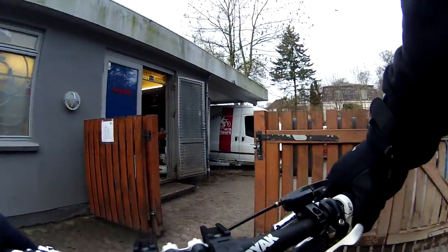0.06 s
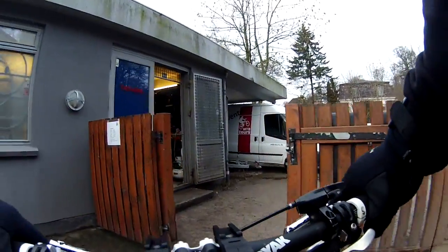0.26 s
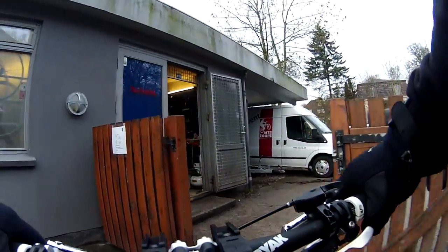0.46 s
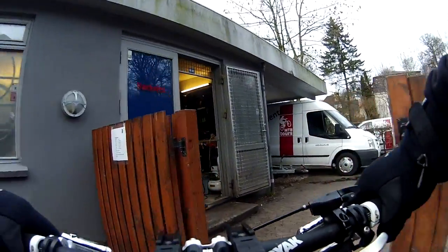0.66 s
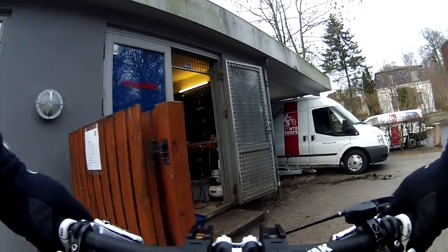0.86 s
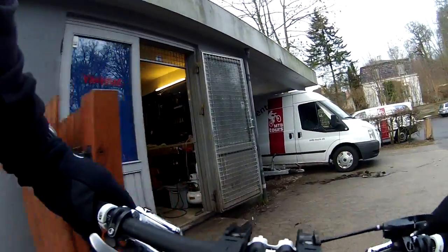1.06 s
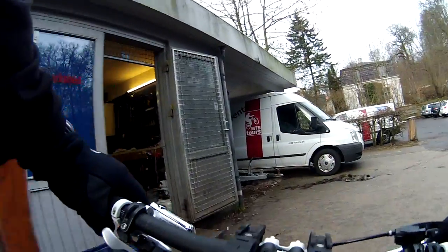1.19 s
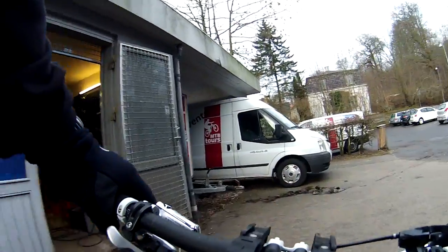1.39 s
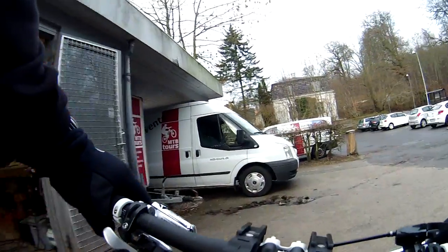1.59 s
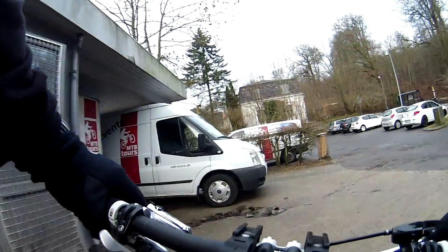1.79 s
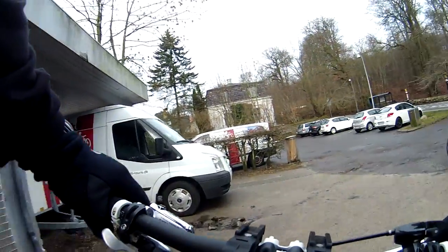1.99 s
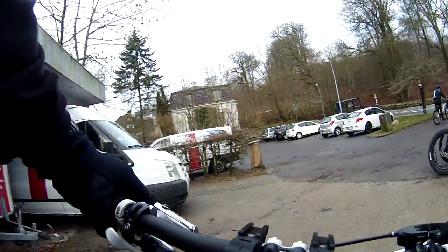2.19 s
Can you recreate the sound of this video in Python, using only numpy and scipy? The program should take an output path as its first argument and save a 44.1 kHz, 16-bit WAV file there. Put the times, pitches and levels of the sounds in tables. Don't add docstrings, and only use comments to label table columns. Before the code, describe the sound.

Bicycle tyres roll over paving with a low, uneven rumble and hum and fine gritty crunching. At about 0.24 s a hard knock on the camera housing clacks and distorts; the level ducks, then recovers by about 0.8 s. Pulsing rumble continues to about 2.25 s, with faint freewheel ticks quickening, small stone pings, deep mount throb, wind flutter and slight hiss. Close, rider-worn microphone outdoors.

```python
import sys
import numpy as np
from scipy import signal
from scipy.fft import rfft, irfft, next_fast_len
from scipy.io import wavfile
from scipy.ndimage import map_coordinates

SR = 44100
rng = np.random.default_rng(int(sys.argv[2]) if len(sys.argv) > 2 else 0)


def nominal_scale(level):
    x = np.asarray(level, float) / 20
    return 10 ** x


def put_to_file(sound):
    columns = np.atleast_2d(sound).T
    safe = np.clip(columns, -1, 1)
    whole_steps = np.round(safe * 32767)
    wavfile.write(sys.argv[1], SR, whole_steps.astype(np.int16))


N = 99225


def unit(x):
    return x / np.sqrt(np.mean(x ** 2) + 1e-20)


def curve(rows):
    return np.interp(np.arange(N) / SR, *np.transpose(rows))


def wobble(rate):
    return map_coordinates(rng.standard_normal(400), [np.arange(N) * rate / SR])


def coloured(x, points):
    m = 2 * next_fast_len(N // 2 + 4096)
    f, db = np.transpose(points)
    log_f = np.log(np.fft.rfftfreq(m, 1 / SR) + 1)
    log_gain = np.interp(log_f, np.log(f), db, left=db[0] + 11) * np.log(10) / 20
    cepstrum = irfft(log_gain, m)
    cepstrum[1:m // 2] *= 2
    cepstrum[m // 2 + 1:] = 0
    return irfft(rfft(x, m) * np.exp(rfft(cepstrum)), m)[..., :N]


def ring(modes, levels_db, rise_s):
    t = np.arange(SR // 2) / SR
    tones = 0
    for (hz, db, t60), more_db in zip(modes, levels_db):
        tones = tones + nominal_scale(db + more_db - 60 * t / t60) * np.sin(2 * np.pi * hz * t)
    return (1 - np.exp(-t / rise_s)) ** 2 * tones


def add_at(out, s, sound):
    out[round(s * SR):][:SR // 2] += sound


def resonance(hz, drift, rate):
    pitch = hz * (1 + drift * wobble(rate))
    return np.sqrt(2) * np.sin(2 * np.pi * np.cumsum(pitch) / SR)


def bursts(events, colour):
    t, white = np.arange(N) / SR, rng.standard_normal(N)
    size = sum((t > s) * nominal_scale(db - 60 * np.abs(t - s) / t60) for s, db, t60 in events)
    return coloured(white * size, colour) / np.std(coloured(white, colour))


# t/s, half length/s, level/dB
SLAB_JOINTS = [(0.03, 0.03, -42), (0.417, 0.13, -43.5), (0.721, 0.039, -35.5), (0.82, 0.013, -54),
               (0.867, .02, -36.5), (0.987, 0.056, -47), (1.074, 0.029, -31.5), (1.162, 0.019, -32),
               (1.219, 0.036, -36), (1.364, 0.039, -32), (1.426, 0.014, -32), (1.499, 0.034, -35.5),
               (1.608, 0.037, -45), (1.686, 0.038, -35), (1.789, 0.011, -31), (1.851, 0.039, -32.5),
               (1.94, 0.0095, -34.5), (2.001, 0.023, -33), (2.102, 0.045, -34), (2.219, .018, -35.5)]


def tyre_load_db():
    t, floor_db = np.arange(N) / SR, -52.5
    swells = sum(nominal_scale(db) * np.exp(-((t - s) / half) ** 2) for s, half, db in SLAB_JOINTS)
    return 20 * np.log10(nominal_scale(floor_db) + swells)


def tyre_hum(load_db):
    level = nominal_scale(load_db + 1.0 * wobble(29.52))
    lower = resonance(148.9, 0.035, 25.0)
    upper = nominal_scale(-12 + 2.5 * wobble(7.75)) * resonance(165, 0.0251, 24.78)
    return level * (lower + upper)


# t/s, level/dB
ROUGHNESS = [(0, -46), (.17, -48.5), (.4, -46), (.66, -47.5), (0.8, -47), (0.932, -45.5), (1.03, -45),
             (1.506, -50), (1.728, -51.5), (1.978, -48), (2.25, -49)]
# f/Hz, level/dB
RUMBLE_TONE = [(100, -22.5), (140, -2), (200, -4.5), (350, -5.5), (420, -8), (500, -23), (620, -29),
               (900, -64.5)]


def frame_rumble(load_db):
    rough_db, level_db = curve(ROUGHNESS), -36.5
    from_load_db = 0.16 * (load_db - load_db.mean())
    from_ground_db = 0.073 * (rough_db - rough_db.mean())
    shake_db = from_load_db + from_ground_db + 1.03 * wobble(35.41)
    return nominal_scale(level_db + shake_db) * unit(coloured(rng.standard_normal(N), RUMBLE_TONE))


# f/Hz, level/dB
GRIT_TONE = [(300, -13), (550, 0.5), (1300, -1.5), (2400, -5.5), (3500, -12), (5300, -15), (7000, -30.5),
             (12000, -41.5)]
# t/s, length/s, level/dB
GRIT_CRUNCHES = [(0.097, 0.017, -42), (0.345, 0.03, -40.5), (0.519, 0.0067, -43), (0.786, 0.016, -41.5),
                 (0.931, 0.0021, -35), (0.939, 0.046, -41.5), (1.012, 0.064, -46.5), (1.112, 0.011, -40.5),
                 (1.143, 0.013, -47), (1.187, 0.018, -42.5), (1.713, 0.015, -47), (1.765, 0.016, -49),
                 (1.805, 0.0072, -47), (1.849, 0.015, -50), (1.885, 0.013, -49), (1.966, 0.012, -51),
                 (2.076, 0.0055, -47), (2.17, 0.0054, -88)]


def tyre_grit():
    t, crunch = np.arange(N) / SR, 0
    for s, length, db in GRIT_CRUNCHES:
        rise = np.clip((t - s) / 0.0028, 0, 1)
        fall = np.clip(1.6 - (t - s) / length, 0, 1)
        crunch = crunch + nominal_scale(db) * rise * fall
    grain_db = 3 * np.minimum(rng.exponential(size=N), 3.5)
    grains = unit(rng.standard_normal(N) * nominal_scale(grain_db))
    bed = nominal_scale(curve(ROUGHNESS) + .4 * wobble(18) + .6 * wobble(45) + .9 * wobble(120))
    white = coloured(rng.standard_normal(N), GRIT_TONE)
    return coloured(grains * np.hypot(bed, crunch), GRIT_TONE) / np.std(white)


def tyres():
    load_db = tyre_load_db()
    return tyre_hum(load_db) + frame_rumble(load_db) + tyre_grit()


# t/s, level/dB
SWING = [(0, -35.5), (.1, -35.5), (.17, -40), (.4, -27), (.7, -33), (0.8, -32.5), (0.884, -44),
         (1.364, -30), (1.43, -38), (1.45, -66), (1.684, -27), (1.748, -52), (1.832, -33), (1.918, -33),
         (1.982, -69), (2.064, -33), (2.224, -65), (2.25, -31)]


def mount_sway():
    return nominal_scale(curve(SWING)) * resonance(30.8, 0.0872, 9.54)


# f/Hz, level/dB, t60/s
HOUSING_MODES = [(277.5, 9.3, .017), (749.5, -4.4, .014), (136, -30, .295), (407, -44, .35), (250, -44, .4),
                 (350, -46, .4), (307.7, -42.5, .45), (292.3, -45.4, .3), (177.8, -40.5, .34),
                 (424.5, -11.2, .02), (219.6, -18.6, .045)]
# t/s, f/Hz, level/dB, t60/s
CLIP_CLACKS = [
    (.2336, 2900, -25, .005),
    (.2362, 2050, -11, .008),
    (.2364, 2650, -13, .006),
    (.2364, 1540, -14, .009),
    (.2382, 4700, -8, .004),
    (.2382, 7500, -19, .003),
    (.2401, 3150, -12, .007),
    (.2403, 5200, -15, .008),
    (.2436, 5150, -10, .006),
    (.2436, 4300, -15, .006),
]
# t/s, level/dB, t60/s
RATTLE_CONTACTS = [
    (.2366, -25, .003),
    (.2383, -16.5, .003),
    (.24, -18, .005),
    (.2437, -30, .004),
]
# f/Hz, level/dB
RATTLE_TONE = [(500, -20), (1200, -14), (2000, 0), (3500, -2), (5000, -1), (6500, -8), (9000, -16),
               (15000, -21)]
# t/s, level/dB, t60/s
AFTER_BUZZES = [
    (.2332, -33, .015),
    (.241, -42, .55),
    (.2495, -37, .02),
    (.2655, -39, .015),
]
# f/Hz, level/dB
BUZZ_TONE = [(600, -14), (2200, 0), (3500, -4), (5000, -2), (6500, -12), (7600, -34), (12000, -55)]


def knock():
    out = np.zeros(N)
    rise_s = .0067
    add_at(out, .2348, nominal_scale(20.6) * ring(HOUSING_MODES, np.zeros(len(HOUSING_MODES)), rise_s))
    out = signal.sosfiltfilt(signal.butter(3, 130, "high", fs=SR, output="sos"), out)
    for s, hz, db, t60 in CLIP_CLACKS:
        add_at(out, s, ring([(hz, db, t60)], [0], rise_s=.00015))
    return out + bursts(RATTLE_CONTACTS, RATTLE_TONE) + bursts(AFTER_BUZZES, BUZZ_TONE)


# t/s, teeth passed/count
TEETH_PASSED = [(.04, -9), (.4575, 0), (.9174, 10), (1.1145, 14), (1.4612, 22), (1.97, 34), (2.26, 41)]
# t/s, level/dB
TICK_LEVEL = [(0, -52), (.4, -49), (.75, -47), (.83, -41), (.88, -46), (1.1, -44), (1.25, -46), (1.29, -43),
              (1.42, -47), (1.46, -37), (1.5, -41), (1.55, -40), (1.59, -44), (1.63, -41), (1.67, -45),
              (1.84, -40), (1.93, -44), (2.01, -41), (2.055, -37), (2.25, -37)]
# f/Hz, level/dB, t60/s
TICK_MODES = [(3850, 0, .011), (3500, -3, .009), (4200, -5, .009), (3150, -9, .008), (4700, -12, .007)]


def freewheel():
    scatter_db, muffle_db, rise_s = 1.3, 2, .0005
    s, teeth = np.transpose(TEETH_PASSED)
    tick_times = np.interp(np.arange(teeth[0], teeth[-1]), teeth, s)
    out = np.zeros(N + SR)
    for when, chance in zip(tick_times, rng.standard_normal((60, 6))):
        db = np.interp(when, *np.transpose(TICK_LEVEL)) + scatter_db * chance[0]
        add_at(out, when, nominal_scale(db + muffle_db) * ring(TICK_MODES, scatter_db * chance[1:], rise_s))
    return out[:N]


# t/s, f/Hz, level/dB, t60/s
SMALL_PINGS = [(.094, 1500, -44, .03), (1.806, 2600, -43, .012), (.357, 2400, -41, .03),
               (.605, 2300, -56, .2), (.646, 11000, -43, .0015), (.927, 1300, -33, .008),
               (1.124, 1040, -46, .06), (1.128, 1650, -48, .05), (1.704, 6500, -47, .003),
               (1.975, 5850, -63, .07), (1.985, 5900, -68, .1), (2.166, 4400, -40, .005)]
# t/s, peak level/dB, f/Hz
BURSTING_STONES = [(0.949, -31, 1410), (1.1139, -34, 1080), (1.1947, -40, 1080), (1.6561, -49, 1350),
                   (1.7659, -43, 1480), (1.8043, -37, 1070), (1.8267, -40, 1220), (1.8484, -35, 1560),
                   (1.8916, -42, 990), (1.9754, -40, 1420), (2.0625, -39, 1260), (2.0796, -38, 1410),
                   (2.227, -49, 1040)]


def pings():
    stones = [(s, hz, db - 8, .015) for s, db, hz in BURSTING_STONES]
    out = np.zeros(N + SR)
    for (s, hz, db, t60), apart in zip(SMALL_PINGS + stones, rng.standard_normal((30, 3))):
        modes = [(hz + .09 * a * 20 / t60, db, t60) for a in apart]
        add_at(out, s, ring(modes, np.zeros(3), rise_s=0.00012))
    return out[:N]


# f/Hz, level/dB
AIR_TONE = [(15, 1), (35, 20.5), (58, 15.5), (75, -16), (120, -5), (200, -41.5)]


def wind():
    air = unit(coloured(rng.standard_normal(N), AIR_TONE))
    return nominal_scale(-45.5 + 3 * wobble(8.9)) * air


# f/Hz, level/dB
HISS_TONE = [(300, -22), (3500, -17), (5500, -10), (7000, -1), (9000, -2), (12500, -3.5), (15200, -8)]


def circuits():
    whine = nominal_scale(-83.5 + 1.8 * wobble(12)) * resonance(10519, 0.00013, 20)
    return nominal_scale(-71) * unit(coloured(rng.standard_normal((2, N)), HISS_TONE)) + whine


def scene():
    return tyres() + mount_sway() + knock() + freewheel() + pings() + wind() + circuits()


def roll_off(x):
    return signal.sosfilt(signal.butter(12, 15910, fs=SR, output="sos"), x)


def record(dry):
    duck_db, fast_db, recover_db_per_s = 15.5, 3.9, 33
    start_s, fast_fall_s, fall_s, hold_s = .2375, .0118, .045, .07
    turns_s = start_s + np.cumsum([0, fast_fall_s, fall_s, hold_s, duck_db / recover_db_per_s])
    t = np.arange(N) / SR
    stages = [t < turns_s[1], t < turns_s[2]]
    right_late_s = np.select(stages, [.0006, 0], .004)
    gain_db = np.interp([t, t - right_late_s], turns_s, [0, -fast_db, -duck_db, -duck_db, 0])

    def stepped(step_db):
        return step_db * np.round(gain_db / step_db)

    x = dry * nominal_scale(np.select(stages, [stepped(.65), gain_db], stepped(.5)))
    clip_top, clip_hard = 1.03, 20
    x = x / (1 + np.abs(x / clip_top) ** clip_hard) ** (1 / clip_hard)
    top_hz = 15560
    x = signal.sosfiltfilt(signal.cheby2(12, 40, top_hz, fs=SR, output="sos"), x)
    return roll_off(x)


dry = scene()
out = record(dry)
put_to_file(out)
```